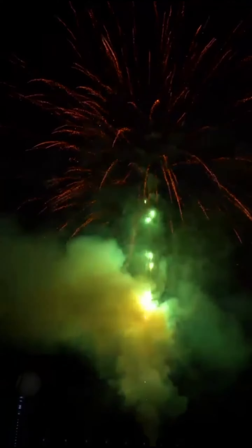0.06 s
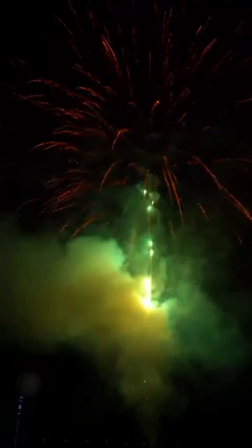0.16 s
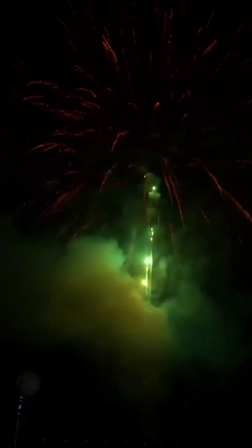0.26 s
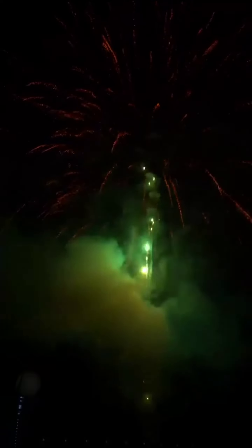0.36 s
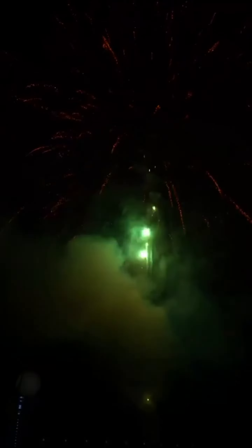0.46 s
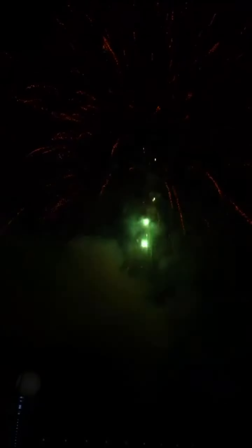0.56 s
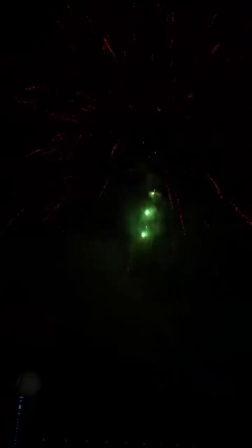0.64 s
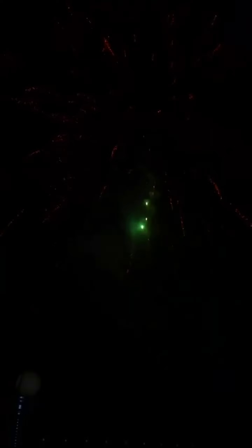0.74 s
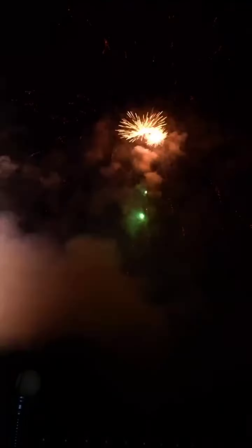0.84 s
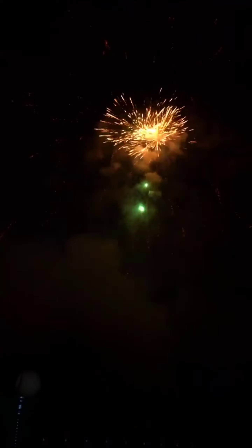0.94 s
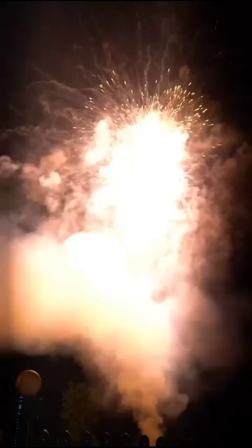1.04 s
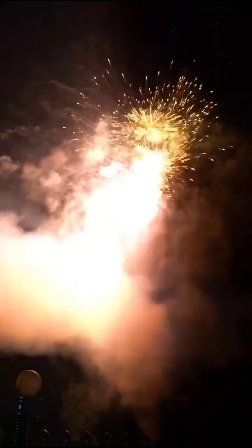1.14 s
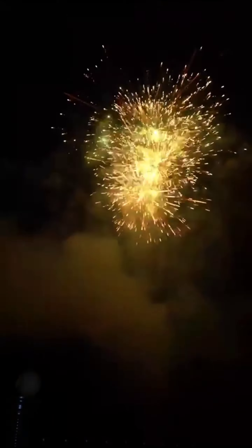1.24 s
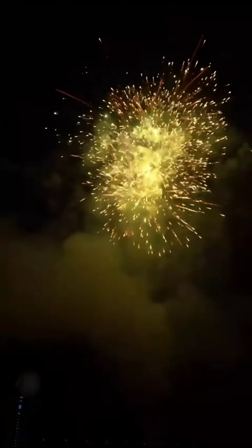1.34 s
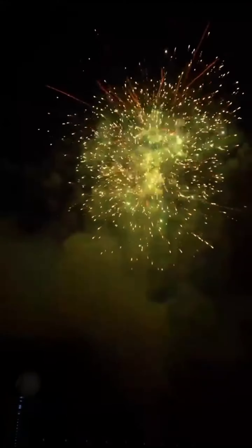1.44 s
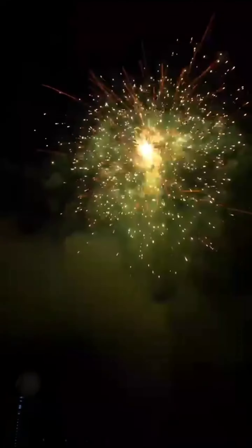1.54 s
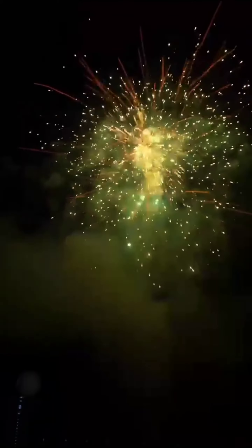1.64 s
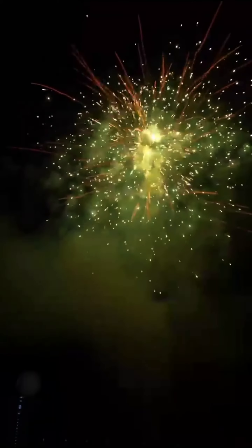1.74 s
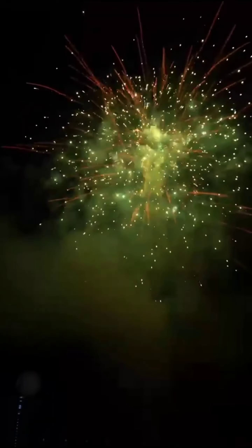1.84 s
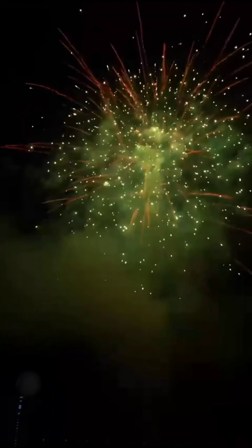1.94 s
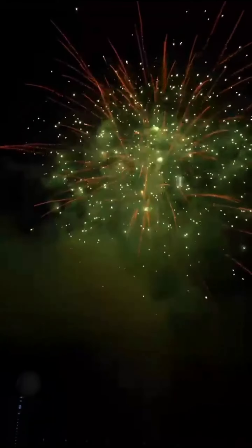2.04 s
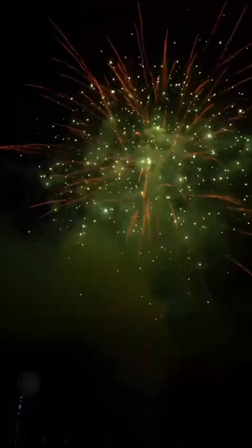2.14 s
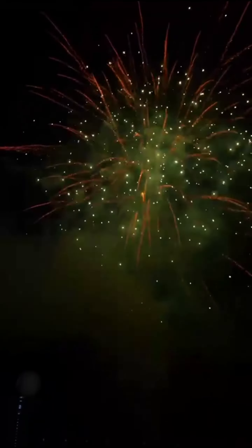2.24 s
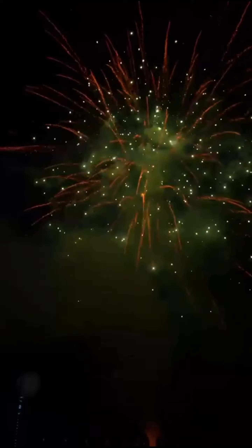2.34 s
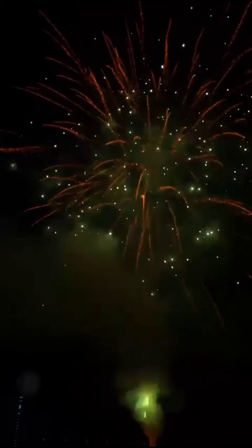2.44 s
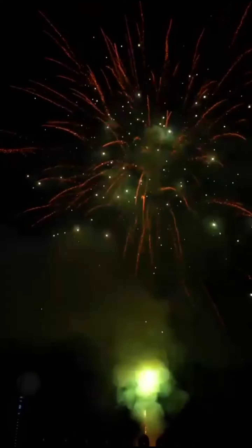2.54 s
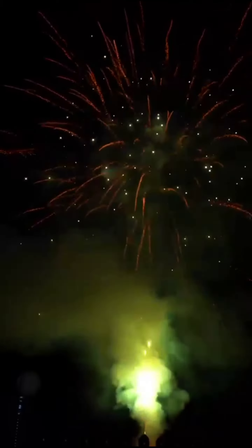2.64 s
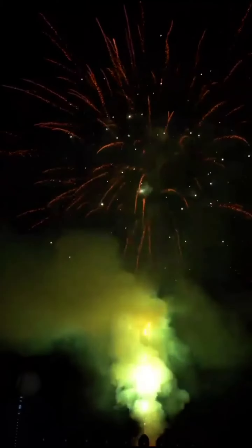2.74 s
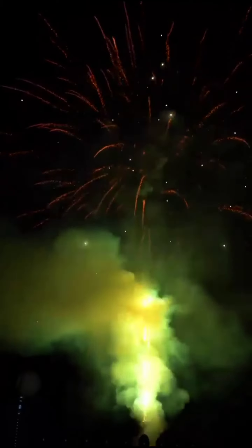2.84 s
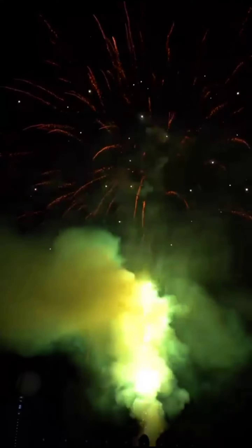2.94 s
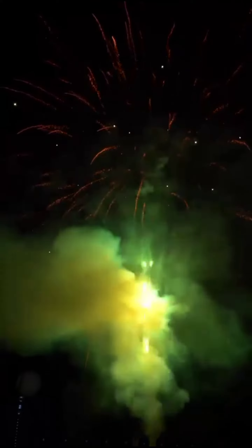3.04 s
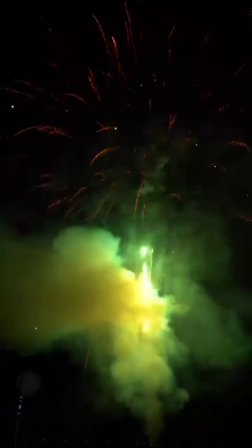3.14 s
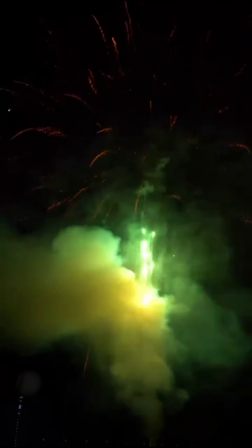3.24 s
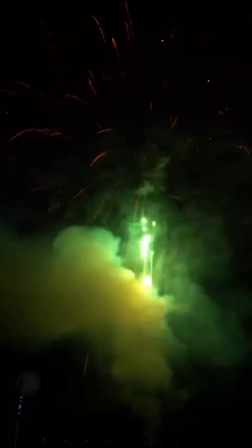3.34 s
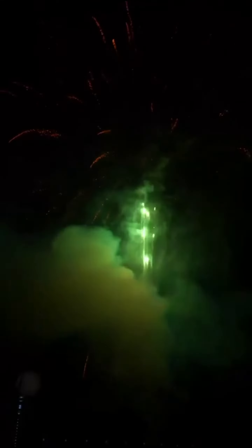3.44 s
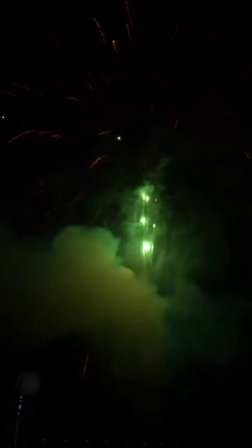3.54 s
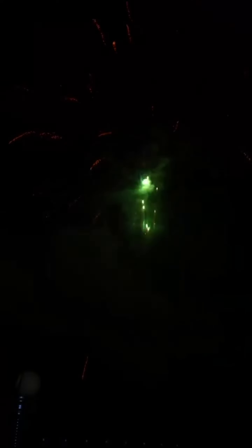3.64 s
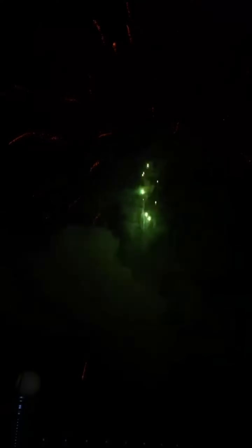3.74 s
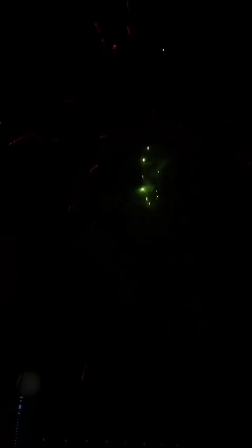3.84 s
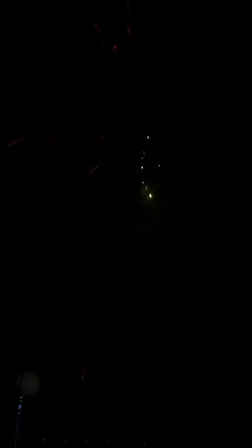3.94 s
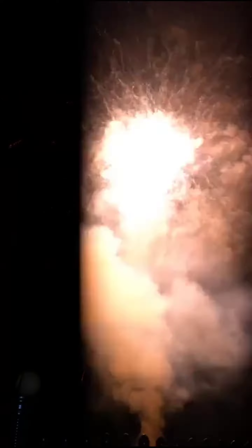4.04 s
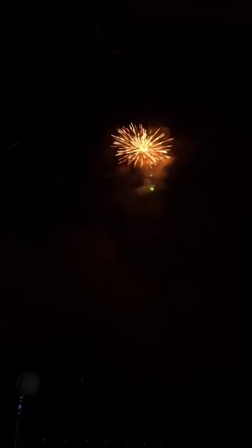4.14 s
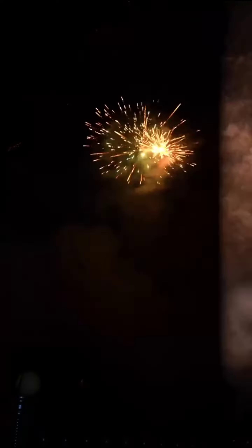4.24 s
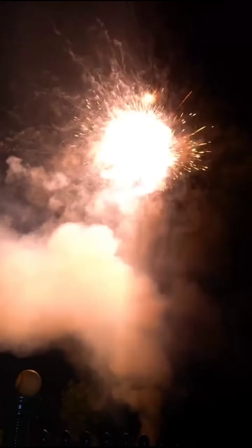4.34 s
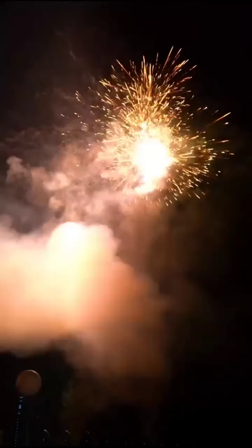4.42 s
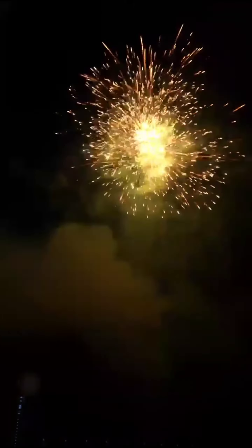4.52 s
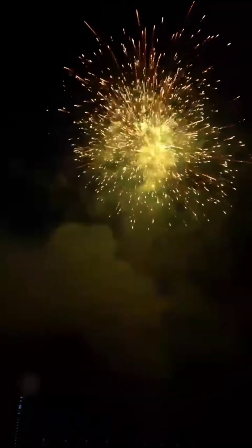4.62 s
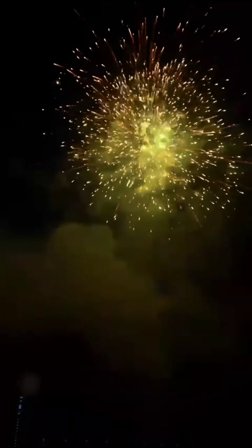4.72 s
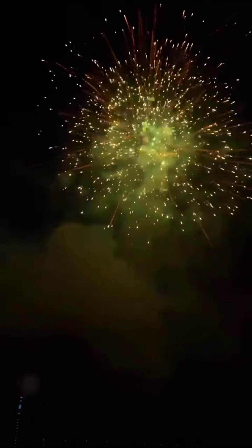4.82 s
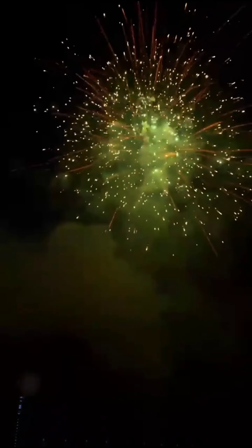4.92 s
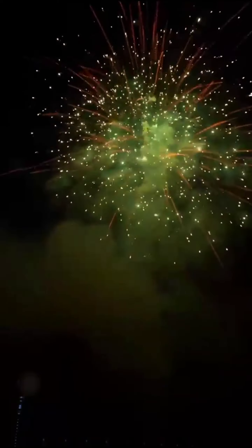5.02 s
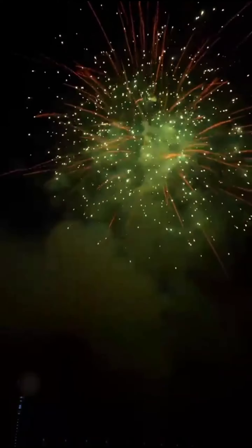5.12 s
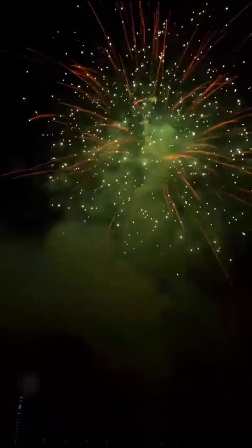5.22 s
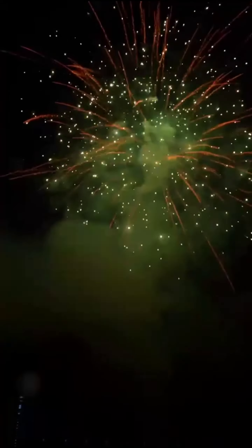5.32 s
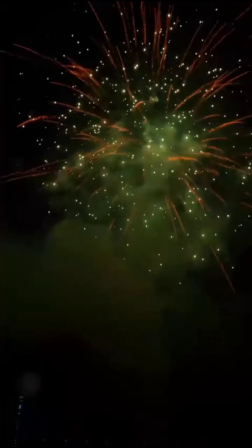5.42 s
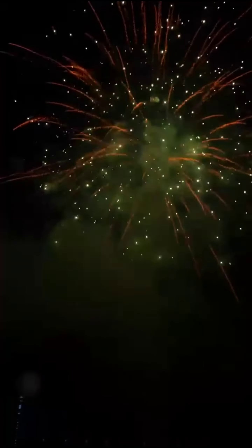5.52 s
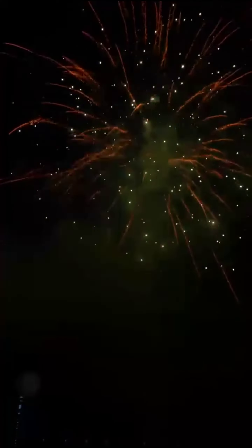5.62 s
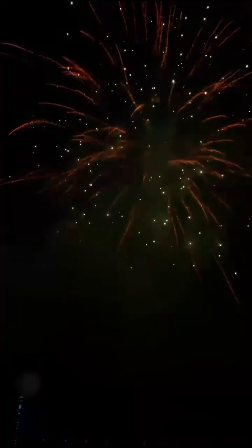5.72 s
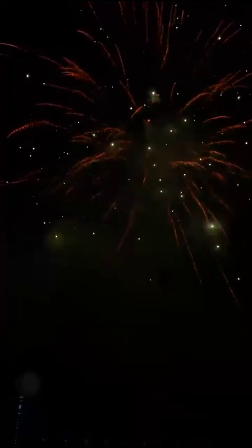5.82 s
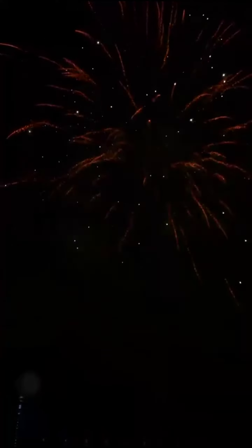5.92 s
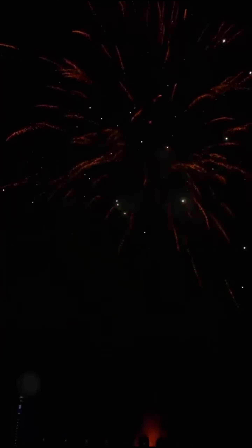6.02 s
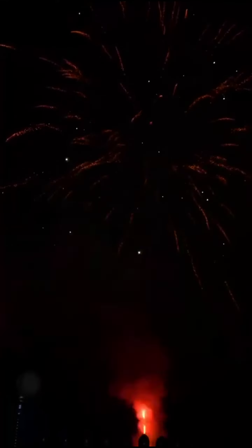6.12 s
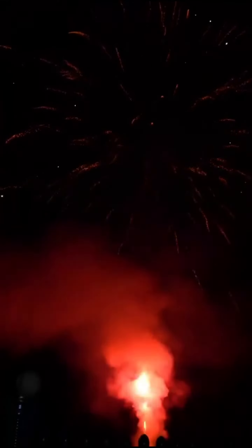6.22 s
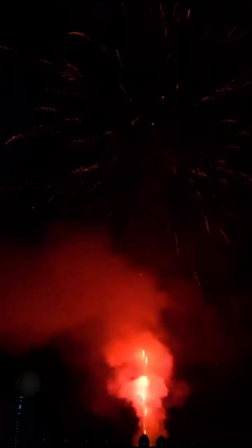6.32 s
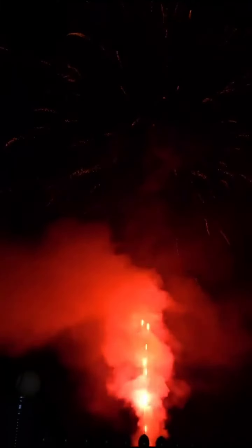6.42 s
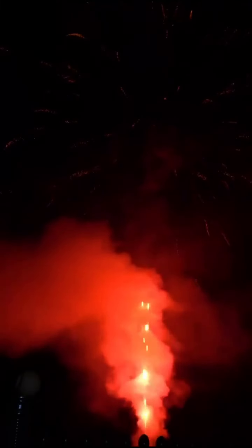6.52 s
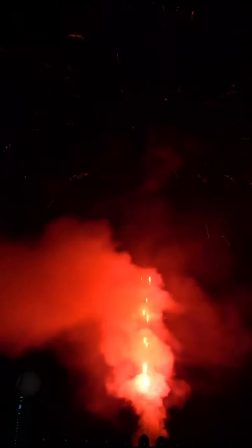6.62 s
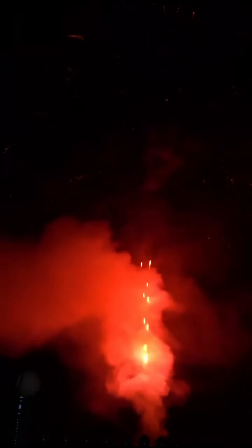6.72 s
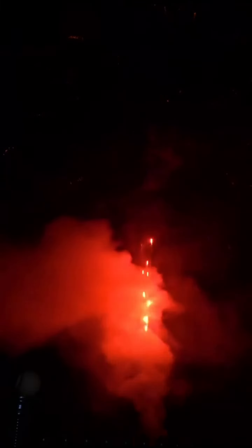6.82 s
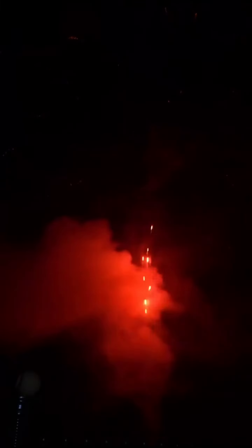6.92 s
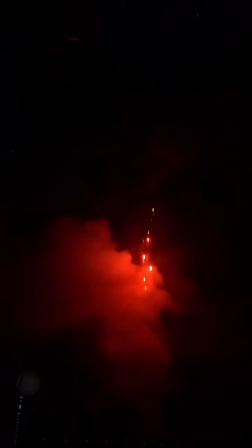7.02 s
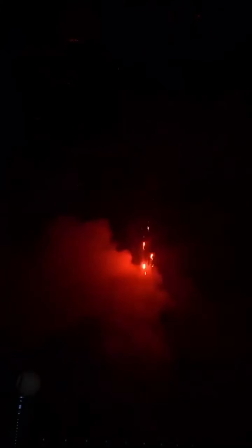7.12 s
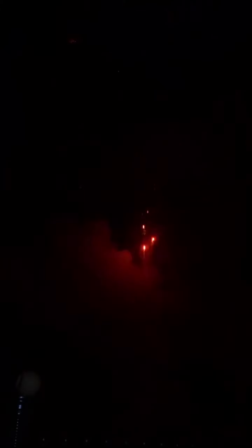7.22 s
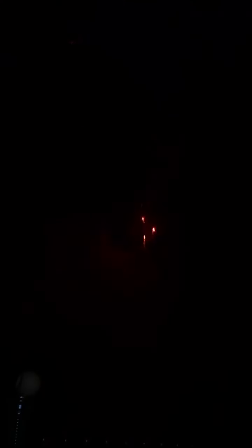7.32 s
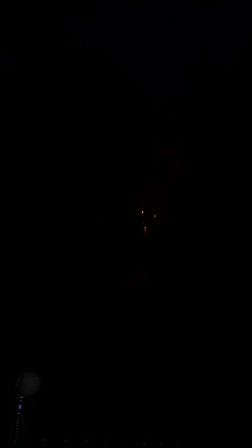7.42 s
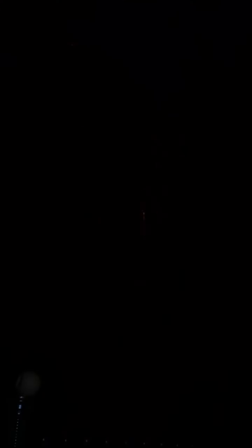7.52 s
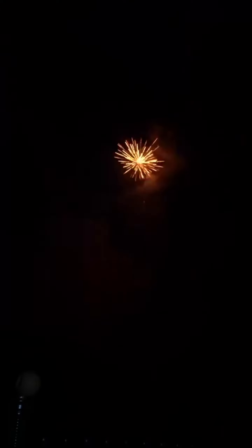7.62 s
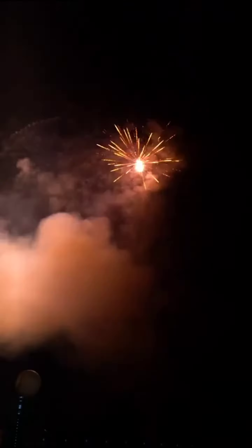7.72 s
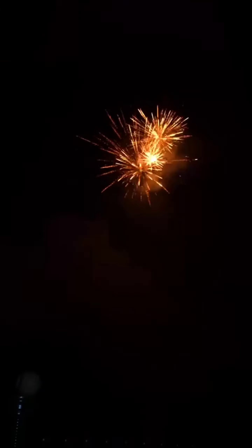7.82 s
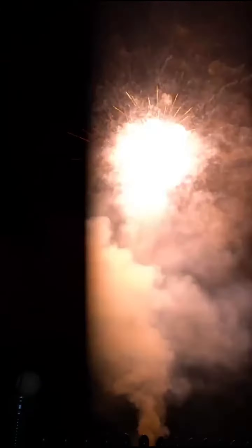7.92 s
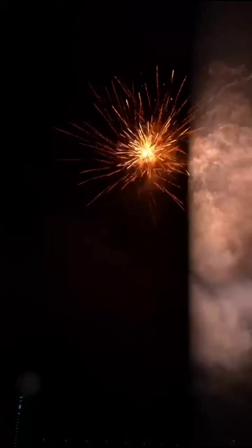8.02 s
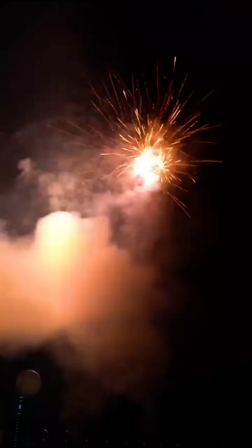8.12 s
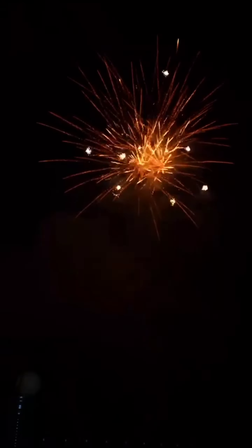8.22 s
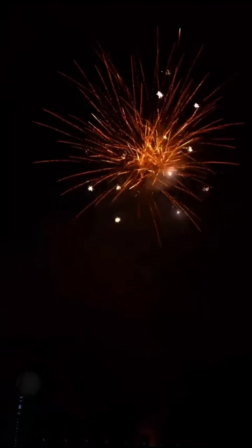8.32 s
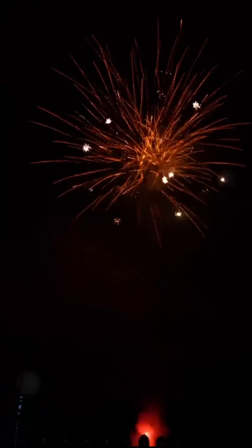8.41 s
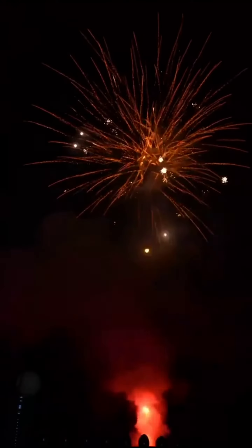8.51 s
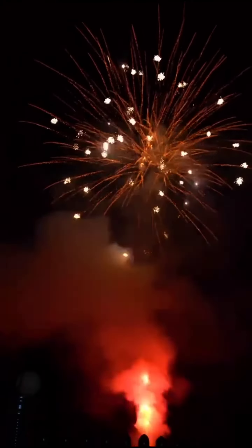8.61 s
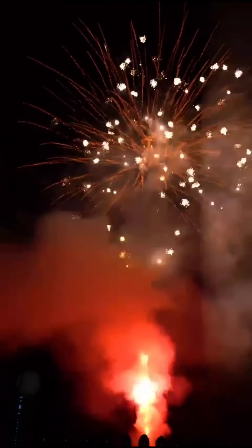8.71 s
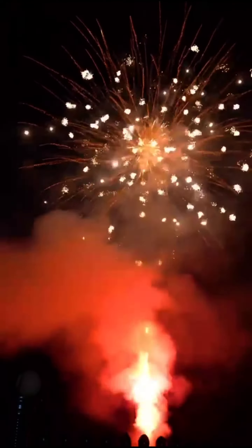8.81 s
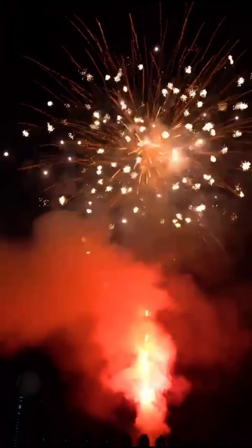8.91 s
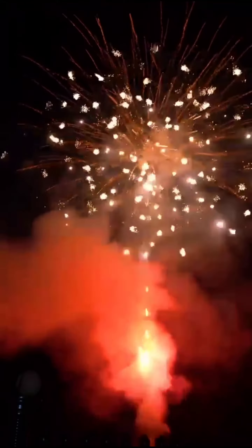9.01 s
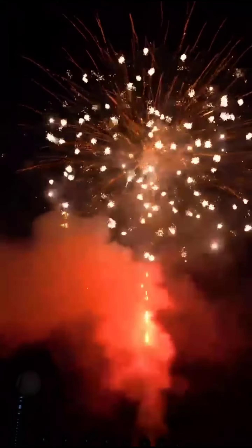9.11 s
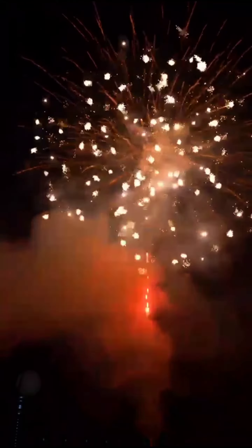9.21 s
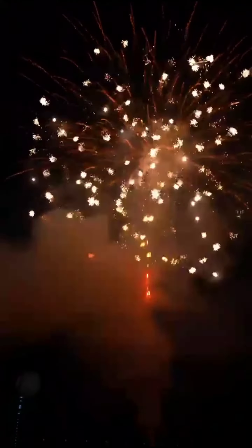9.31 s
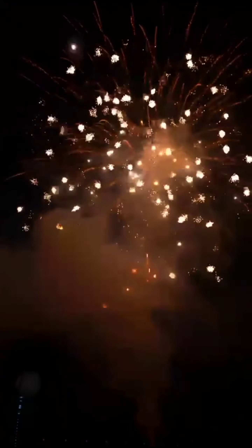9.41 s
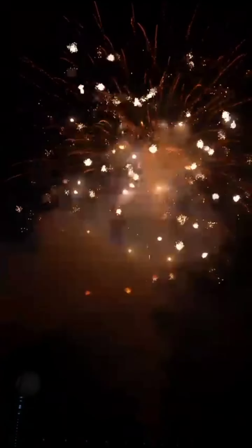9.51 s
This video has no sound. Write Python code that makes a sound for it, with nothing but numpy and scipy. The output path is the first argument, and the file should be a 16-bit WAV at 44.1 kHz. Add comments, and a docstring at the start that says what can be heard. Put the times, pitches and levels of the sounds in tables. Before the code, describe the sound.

Three volleys of loud aerial firework bursts with rumbling echoes, separated by runs of hollow launch thumps, ending in a faint crackle.

```python
"""Firework shells burst in salvos overhead at night, a few dozen metres away: filtered shock pulses plus ground bounces.
Runs of mortar thumps lift them: short blasts ring damped tube modes.
Walls return delayed pulses; trees and open country scatter shaped noise that rolls away.
Random clicks crackle at the end, over faint rumble and hiss. A limiter ducks after every burst."""
import sys
import numpy as np
from scipy import signal
from scipy.fft import rfft, irfft, next_fast_len
from scipy.io import wavfile
from scipy.ndimage import uniform_filter1d, minimum_filter1d

SR = 44100
rng = np.random.default_rng(int(sys.argv[2]) if len(sys.argv) > 2 else 0)


def to_wav(s):
    """Save 16-bit WAV."""
    ch = np.atleast_2d(s).T  # columns
    pcm = np.round(np.clip(ch, -1, 1) * 32767)  # PCM
    wavfile.write(sys.argv[1], SR, pcm.astype(np.int16))


N = 421596

# shell bursts; those before 0 s are heard only by their echoes: (time [s], level [dB], echo send [dB])
BURSTS = [(-1.7, 16, 16), (-1.5, 16, 16), (-1.3, 14, 14), (1.092, 9, 8.5), (1.1357, 6, 6.5),
          (1.2792, 10, 9.5), (1.3405, 6, 6), (1.3485, 5, 4), (1.3555, 5, 4), (1.3855, 10, 9),
          (1.4063, 9.5, 8), (1.795, 9, 8), (4.3567, 11.5, 12.5), (4.479, 12, 9.5), (4.5757, 7, 6),
          (4.582, 5, 4), (4.5877, 8, 5), (4.6278, 7, 6), (4.6368, 6.5, 4), (4.739, 10, 7.5),
          (4.7875, 10.5, 8), (7.8798, 11, 11), (8.007, 9, 7), (8.0583, 8, 6.5), (8.1079, 10, 7.5),
          (8.2367, 9.5, 6), (8.2937, 9.5, 6.5), (8.3553, 9, 7.5), (8.4149, 8, 7.5), (9.0137, 6, 5.3)]
# house fronts that return every burst as a dull slap: (delay [s], level re echo send [dB], centre [Hz])
HOUSES = [(.079, -17, 380), (.087, -18, 750), (.112, -23, 190), (.175, -17.5, 320), (.383, -24, 230)]
# loudest late echoes, off big buildings: (time [s], level [dB], centre [Hz])
BUILDING_KNOCKS = [(1.728, -11, 400), (1.751, -11, 400), (1.968, -11, 300), (2.178, -17, 280),
                   (4.961, -11, 330), (5.063, -15, 330), (8.574, -8, 330), (8.633, -10, 330),
                   (9.203, -11, 350), (9.231, -12, 420), (9.397, -19, 350)]
# lift charges: (time [s], level [dB], snap re thump [dB], echo send [dB])
LIFTS = [(-.5, -5, -6, -5), (-.35, -7, -6, -7), (2.5098, -10, -11, -10), (2.5703, -8.5, -12, -9),
         (2.632, -10.5, -9, -9.5), (2.7084, -9.5, -7, -9), (2.747, -8.5, -4, -8), (2.8266, -9, -2, -8),
         (2.8639, -10, -5, -9), (2.9125, -9, -3, -8), (2.9603, -7.5, 0, -6), (6.2497, -9, -3, -6),
         (6.2966, -6, -6, -4.5), (6.3376, -11, 1, -9), (6.394, -8.5, -2, -8), (6.4457, -8, -6, -7.5),
         (6.5354, -7, -3, -7), (6.6007, -9, -7, -9.5), (6.6472, -8, -3, -8.5), (8.7435, -8, -8, -8),
         (8.8014, -10, -8, -10), (8.85, -9, -7, -9), (8.9495, -7, -1, -7), (8.9883, -8, -1, -8),
         (9.099, -6, -4, -7)]
# mortar tube modes, before detuning: (frequency [Hz], t60 [s], level [dB])
TUBE_MODES = [(275, .05, -12), (860, .02, -3.3), (1600, .014, -9)]
# flat walls that return every lift as a thin crack: (delay [s], level re lift [dB])
WALLS = [(.0468, -6), (.256, -19), (.354, -19), (.412, -21), (.61, -24)]
# echo and night spectra: (frequency [Hz], relative density [dB per Hz])
BURST_ECHO_SPECTRUM = [(25, -31), (40, -24), (60, -9.8), (80, -5.3), (120, -.8), (160, -2.7), (185, 2.3),
                       (208, -3.8), (245, -3.3), (370, .7), (500, -2.8), (750, -13), (1050, -10.5),
                       (2000, -17.9), (3000, -19.8), (4900, -28.3), (6300, -24.8), (8000, -31),
                       (11500, -32.5)]
LIFT_ECHO_SPECTRUM = [(25, -26), (60, -10), (125, 3.3), (180, -5), (275, 5.5), (480, 1), (640, -8),
                      (850, -.3), (1150, -8.5), (1600, -4.3), (2000, -10.5), (3200, -15), (4900, -21.5),
                      (6300, -19.3), (7700, -29), (11500, -27.5)]
NIGHT_SPECTRUM = [(25, -18), (38, -16), (52, -2), (90, -15), (170, -1), (250, -1), (370, 0), (700, -14),
                  (1500, -23.5), (3500, -37), (7000, -38), (9500, -36), (12000, -36)]
# path loss to soft ground (bass) and air (treble), before dulling: (frequency [Hz], loss [dB per s])
PATH_LOSS = [(110, 4), (360, .9), (1000, 1.5), (2800, 3.9), (5600, 11), (11000, 24)]
# width of the bursts' echoes from trees all around: (frequency [Hz], side re mid [dB])
WIDE = [(30, -38), (120, -26), (260, -11), (500, -8.5), (1000, -8.5), (2000, -6), (4000, -.5), (11000, 1)]
# width of everything lower or further away: (frequency [Hz], side re mid [dB])
NARROW = [(30, -52), (140, -46), (280, -32), (560, -21), (1100, -13), (2200, -6.5), (4500, -1.5),
          (11000, .5)]
# mismatch of the two microphones: (frequency [Hz], left re right [dB])
MIC_MISMATCH = [(100, -.1), (500, -.9), (1000, -.1), (2000, 1.5), (4000, .6), (6300, -2.2), (8500, -4),
                (11500, .5)]

MIC_RING_HZ, MIC_RING_T60_S, MIC_RING_DB = 410, .04, -13
KNOCK_GROUND_S, KNOCK_GROUND_DB = .0055, -5
CRACKLE_START_S, CRACKLE_RISE_S, CRACKLE_DB = 8.4, .65, -35.5
NIGHT_DB = -45.8
TOP_HZ = 11400
STEP = 128  # samples per echo envelope point
TIME_S = np.arange(N) / SR
SHORT_S = TIME_S[:2048]
FFT_SIZE = next_fast_len(N, real=True)
BIN_HZ = np.maximum(np.fft.rfftfreq(FFT_SIZE, 1 / SR), 1)


def bursts(ground_s=.0044, stray_s=.00015, left_db=-5.5, right_db=-12, trail_db=-20,
           rough_ground_db=-17, splash_s=.022, splash_rise_s=.012, splash_db=-27):
    """Overhead shocks, each with a sharp ground bounce louder at left, a brief low ring and a nearby splash."""
    out = np.zeros((2, N))
    count = len(BURSTS)
    direct = shock(push_s=.0012, low_hz=205, top_hz=560, edge_db=-8.5, edge_s=.00007)
    bounce = shock(push_s=.0012, low_hz=235, top_hz=620, edge_db=2, edge_s=.00007)
    bounce = bounce * undb([[left_db], [right_db]])
    ring = decay(MIC_RING_T60_S, MIC_RING_DB) * np.sin(2 * np.pi * MIC_RING_HZ * SHORT_S)
    trails = undb(trail_db) * splinters(count, t60_s=.075, top_hz=1500)
    rough = undb(rough_ground_db) * splinters(count, t60_s=.012, top_hz=3600)
    splashes = undb(splash_db) * splinters(count, t60_s=.13, top_hz=1500)
    splashes = splashes * np.minimum(SHORT_S / splash_rise_s, 1)
    strays = stray_s * rng.standard_normal(count)
    for (s, db, _), trail, grit, splash, late_s in zip(BURSTS, trails, rough, splashes, strays):
        add(out, s, undb(db) * (direct + trail))
        add(out, s + ground_s + late_s, undb(db) * (bounce + ring + grit))
        add(out, s + splash_s, undb(db) * splash)
    return out


def slaps(stray_s=.002, uneven_db=2):
    """House fronts return each burst as dull slaps; its place in the sky shifts delay and level a little."""
    out = np.zeros((2, N))
    waves = [thud(hz) for _, _, hz in HOUSES]
    chances = rng.standard_normal((len(BURSTS), len(HOUSES), 2))
    for (s, _, send_db), chance in zip(BURSTS, chances):
        for (delay_s, house_db, _), wave, (late, strong) in zip(HOUSES, waves, chance):
            gain = undb(send_db + house_db + uneven_db * strong)
            add(out, s + delay_s + stray_s * late, gain * wave)
    return out


def knocks():
    """Big buildings return a few bursts as dull knocks, each doubled by the ground."""
    out = np.zeros(N)
    for s, db, hz in BUILDING_KNOCKS:
        add(out, s, undb(db) * thud(hz))
        add(out, s + KNOCK_GROUND_S, undb(db + KNOCK_GROUND_DB) * thud(hz))
    return out


def far_slaps(count, first_s=.5, last_s=3.6, echo_db=-37, fade_db_per_s=4.5,
              centre_hz=350, spread_octaves=.3, uneven_db=3):
    """Distant buildings repeat every burst as dull knocks of varied pitch and level: an uneven roll."""
    out = np.zeros(N)
    for k, (place, depth, strong) in enumerate(rng.uniform(-1, 1, (count, 3))):
        delay_s = first_s + (last_s - first_s) * (k + .5 + place / 2) / count
        gain = undb(echo_db - fade_db_per_s * delay_s + uneven_db * strong)
        wave = gain * thud(centre_hz * 2 ** (spread_octaves * depth))
        for s, _, send_db in BURSTS:
            add(out, s + delay_s, undb(send_db) * wave)
    return out


def roar():
    """Near, wide scatter of the bursts: coloured grains with a fast decay."""
    return scatter(BURSTS, BURST_ECHO_SPECTRUM, WIDE, grains(rate_hz=7000, spread_db=2.5),
                   echo_db=-25.6, gap_s=.02, start_db=-13, attack_s=.095, hold_s=.16, t60_s=1.13,
                   dulling=.85, surge_db=2.1, surge_s=.025)


def roll():
    """Far, narrow scatter of the bursts: fainter grains with a long, duller decay."""
    return scatter(BURSTS, BURST_ECHO_SPECTRUM, NARROW, grains(rate_hz=4500, spread_db=2.7),
                   echo_db=-41.6, gap_s=.03, start_db=-13, attack_s=.2, hold_s=.18, t60_s=9.1,
                   dulling=1.1, surge_db=1.8, surge_s=.04)


def lifts(detune=.08, blast_db=-4, trail_db=-17, snap_db=-3.5, rasp_db=-8.5,
          splash_s=.0263, splash_db=-21, splash_spread_db=2.5, ring_rise_s=.0007):
    """Blasts ring the tubes, with snaps; rough things nearby return a splash, flat walls thin cracks."""
    out = np.zeros((2, N))
    count = len(LIFTS)
    blast = undb(blast_db) * shock(push_s=.0014, low_hz=180, top_hz=800, edge_db=-12)
    snap = undb(snap_db) * shock(push_s=.0005, low_hz=700, top_hz=2300, edge_db=-24)
    crack = shock(push_s=.0007, low_hz=450, top_hz=1700, edge_db=-28)
    rasps = undb(rasp_db) * cut(splinters(count, t60_s=.02, top_hz=2500), 3300, "low")
    trails = undb(trail_db) * splinters(count, t60_s=.08, top_hz=700)
    splashes = undb(splash_db) * splinters(count, t60_s=.07, top_hz=1800)
    chances = rng.standard_normal((count, len(TUBE_MODES)))
    for (s, db, hard_db, _), chance, rasp, trail, splash in zip(LIFTS, chances, rasps, trails, splashes):
        ring = np.zeros(len(SHORT_S))
        for (hz, t60_s, mode_db), c in zip(TUBE_MODES, chance):
            ring += decay(t60_s, mode_db) * np.sin(2 * np.pi * hz * (1 + detune * c) * SHORT_S)
        ring *= 1 - np.exp(-SHORT_S / ring_rise_s)  # the tube takes a moment to speak
        hard = undb(hard_db)
        add(out, s, undb(db) * (blast + ring + trail + hard * (snap + rasp)))
        add(out, s + splash_s, undb(db + splash_spread_db * rng.standard_normal()) * splash)
        for delay_s, wall_db in WALLS:
            add(out, s + delay_s, undb(db + wall_db) * (crack + hard * snap))
    return out


def rustle():
    """Narrow scatter of the lifts: coloured grains, quick to start and strongly dulled."""
    return scatter(LIFTS, LIFT_ECHO_SPECTRUM, NARROW, grains(rate_hz=5000, spread_db=2.6),
                   echo_db=-24.8, gap_s=.005, start_db=-7, attack_s=.05, hold_s=.16, t60_s=1.75,
                   dulling=1.6, surge_db=1.3, surge_s=.015)


def crackle(cluster_s=.02, cluster_db=2):
    """Popping stars: dense bright clicks spread across the stereo field, clustered in level, fading in."""
    clicks = grains(rate_hz=3000, spread_db=3.3)
    mid, side = cut(cut(clicks, 600, "high", order=1), 2400, "low", order=1)
    clusters = smooth_noise(N, cluster_s * SR)
    pops = np.array([mid + side, mid - side]) * undb(cluster_db * clusters / clusters.std())
    rise = np.clip((TIME_S - CRACKLE_START_S) / CRACKLE_RISE_S, 0, 1)
    return pops / pops.std() * undb(CRACKLE_DB) * rise


def night():
    """Faint rumble and hiss: coloured, narrow stereo noise."""
    noise = rng.standard_normal((2, N), dtype=np.float32)
    return undb(NIGHT_DB) * irfft(tint(noise, NIGHT_SPECTRUM, NARROW), FFT_SIZE)[:, :N]


def scatter(bangs, spectrum, width, texture, echo_db, gap_s, start_db, attack_s, hold_s, t60_s,
            dulling, surge_db, surge_s):
    """Many small echoes of each bang: grains in bands, surging in level, duller with path length."""
    s, *_, send_db = np.transpose(bangs)
    delay_s = np.maximum(TIME_S[::STEP] - s[:, None], 0)
    surge = smooth_noise(delay_s.shape[1], surge_s * SR / STEP)
    paths = answer(delay_s, gap_s, start_db, attack_s, hold_s, t60_s) * undb(send_db[:, None] + echo_db)
    ears = tint(texture, spectrum, width)
    out = np.zeros((2, N), np.float32)
    loss_hz = np.array(PATH_LOSS)[:, 0]
    # fractional band index of each bin, for triangular crossfades
    place = np.interp(np.log(BIN_HZ), np.log(loss_hz), np.arange(len(PATH_LOSS))).astype(np.float32)
    for k, (hz, loss_db_per_s) in enumerate(PATH_LOSS):
        band = irfft(ears * np.maximum(1 - np.abs(place - k), 0), FFT_SIZE)[:, :N]
        dulled = paths * undb(-dulling * loss_db_per_s * delay_s)
        size = np.sqrt(np.sum(dulled ** 2, axis=0))
        # big reflectors make the lows surge; foliage keeps the treble even
        size *= undb(surge_db * surge / surge.std() / (1 + hz / 2000))
        out += band * np.repeat(size.astype(np.float32), STEP)[:N]
    return out


def answer(delay_s, gap_s, start_db, attack_s, hold_s, t60_s):
    """Echo gain after a bang: faint across open ground, then attack, hold, release."""
    attack = undb(start_db) + np.maximum(delay_s - gap_s, 0) / attack_s
    attack = np.minimum(attack, 1) * (delay_s > 0)
    return attack * undb(-60 * np.maximum(delay_s - hold_s, 0) / t60_s)


def from_left(sound, lead_s=.00004, side_db=-13):
    """Source a little to the left: that ear hears it earlier, and its upper range louder."""
    lean = undb(side_db) * cut(sound, 600, "high", order=1)
    left, right = sound + lean * np.array([[1], [-1]])
    return np.array([left, np.interp(TIME_S - lead_s, TIME_S, right)])


def shock(push_s, low_hz, top_hz, edge_db, edge_s=.00012):
    """Blast wave: sharp edge, short push, then suction; the microphone's bass cut makes it swing."""
    body = (1 - SHORT_S / push_s) * np.exp(-SHORT_S / push_s)
    body = cut(cut(body, low_hz, "high", order=3), top_hz, "low")
    edge = cut(np.exp(-SHORT_S / edge_s), 700, "high", order=1)
    return body / np.abs(body).max() - undb(edge_db) * edge


def thud(hz):
    """A shock whose edge has worn off with distance, centred near hz."""
    return shock(push_s=.45 / hz, low_hz=.75 * hz, top_hz=1.2 * hz, edge_db=-30)


def splinters(count, t60_s, top_hz):
    """Ragged noise trails from things close by, one per bang; the ears differ mainly in the treble."""
    mid, side = rng.standard_normal((2, count, len(SHORT_S)))
    side = cut(side, 2200, "high", order=1)
    noise = np.stack([mid + side, mid - side], axis=1)
    noise = cut(cut(noise, 400, "high"), top_hz, "low", order=1)
    noise = cut(noise, 5500, "low", order=1)
    return noise / noise.std() * decay(t60_s)


def grains(rate_hz, spread_db):
    """Random clicks of uneven size from all directions, as mid and side."""
    count = int(rate_hz * N / SR)
    when, size, sign, side = rng.random((count, 4)).T
    size = np.sign(sign - .5) * undb(-spread_db * np.log(np.maximum(size, .02)))
    at = (when * N).astype(int)
    side_size = size * np.sqrt(12) * (side - .5)  # same mean power as mid
    return np.array([np.bincount(at, size, N), np.bincount(at, side_size, N)])


def tint(mid_side, spectrum, width):
    """Left and right spectra of a texture, coloured and widened, for an rms of 1."""
    whole = rfft(mid_side.astype(np.float32), FFT_SIZE)
    whole *= colour(spectrum, BIN_HZ) * (BIN_HZ < 2 * TOP_HZ)
    whole[1] *= colour(width, BIN_HZ)
    whole *= FFT_SIZE / np.sqrt(2 * np.sum(np.abs(whole) ** 2))
    return np.array([whole[0] + whole[1], whole[0] - whole[1]])


def smooth_noise(count, width):
    """Random level curve: noise averaged over width points."""
    return uniform_filter1d(rng.standard_normal(count), size=max(int(width), 1))


def decay(t60_s, db=0):
    """Exponential decay from db, losing 60 dB in t60_s."""
    return undb(db - 60 * SHORT_S / t60_s)


def undb(db):
    """Decibels to gain."""
    return 10 ** (np.asarray(db) / 20)


def colour(points, hz):
    """Gain of a (frequency [Hz], level [dB]) curve at hz."""
    f, db = np.transpose(points)
    return undb(np.interp(np.log(hz), np.log(f), db))


def cut(x, hz, kind, order=2):
    """Butterworth low-pass or high-pass."""
    sos = signal.butter(order, min(hz, SR / 2 - 1), kind, fs=SR, output="sos")
    return signal.sosfilt(sos, x)


def add(out, s, sound):
    """Mix a short sound in at time s; skip it if it starts outside the scene."""
    i = int(s * SR)
    if 0 <= i < N:
        out[..., i:i + sound.shape[-1]] += sound[..., :N - i]


def scene():
    """Bursts and their echoes, lifts and their echo from the left, crackle, night air."""
    burst_sound = bursts() + slaps() + knocks() + far_slaps(count=14) + roar() + roll()
    lift_sound = from_left(lifts()) + from_left(rustle(), lead_s=.00003, side_db=-20)
    return burst_sound + lift_sound + crackle() + night()


def record(dry, ceiling=.59, release_s=.0235):
    """Two unequal microphones; a fast limiter catches the shocks and ducks behind them; the top is cut."""
    tilt = np.sqrt(colour(MIC_MISMATCH, BIN_HZ))
    dry = irfft(rfft(dry, FFT_SIZE) * np.array([tilt, 1 / tilt]), FFT_SIZE)[:, :N]
    fall = TIME_S / release_s
    level_log = np.log(np.abs(dry).max(axis=0) + 1e-9)
    held = np.exp(np.maximum.accumulate(level_log + fall) - fall)  # jumps up, sinks slowly
    gain = minimum_filter1d(np.minimum(ceiling / held, 1), size=25)
    gain = uniform_filter1d(gain, size=25)
    top_cut = signal.ellip(10, .2, 80, TOP_HZ, fs=SR, output="sos")
    return signal.sosfilt(top_cut, dry * gain)


dry = scene()
out = record(dry)
to_wav(out)
```